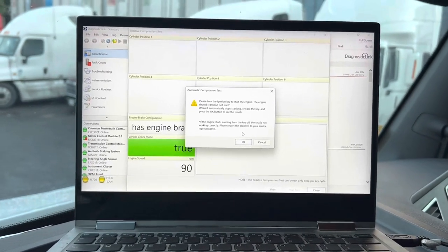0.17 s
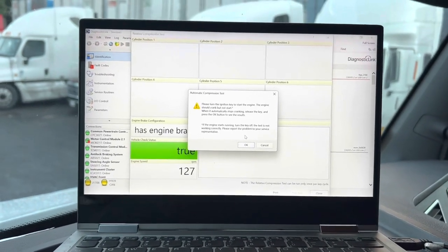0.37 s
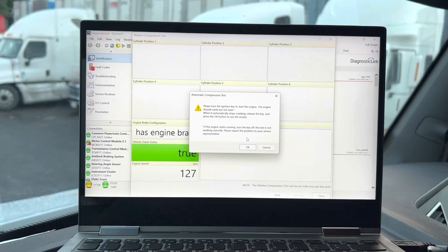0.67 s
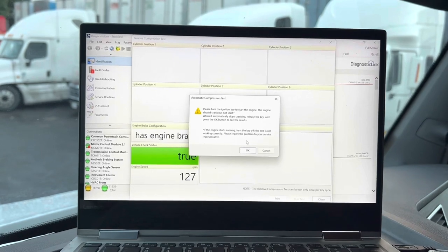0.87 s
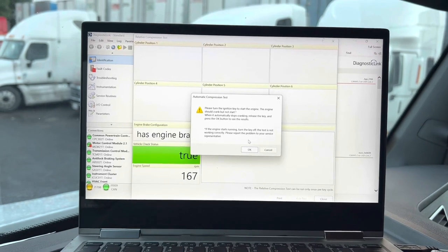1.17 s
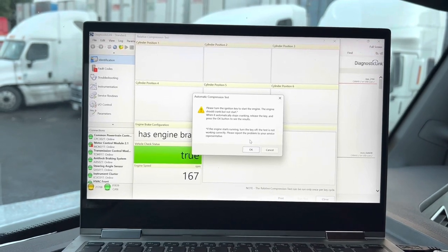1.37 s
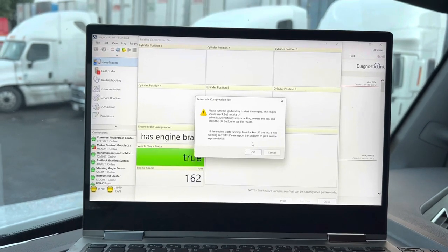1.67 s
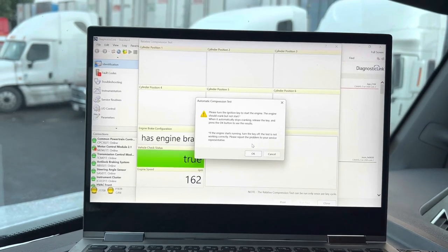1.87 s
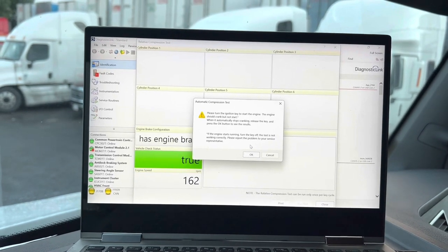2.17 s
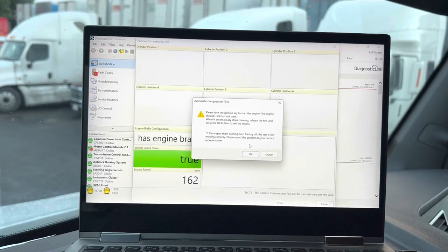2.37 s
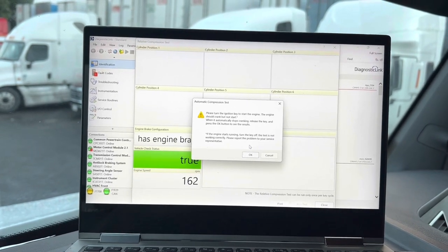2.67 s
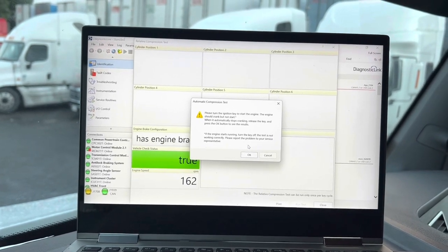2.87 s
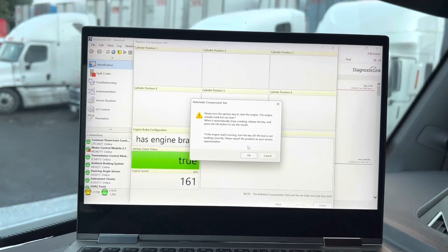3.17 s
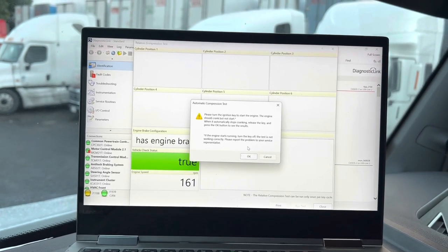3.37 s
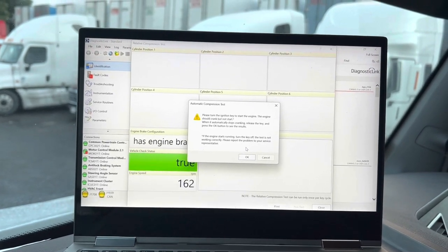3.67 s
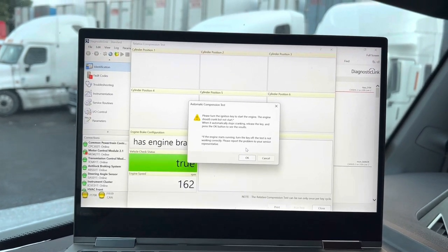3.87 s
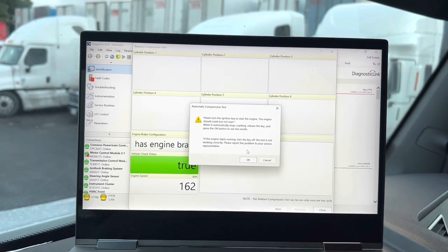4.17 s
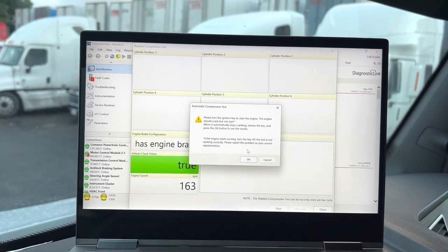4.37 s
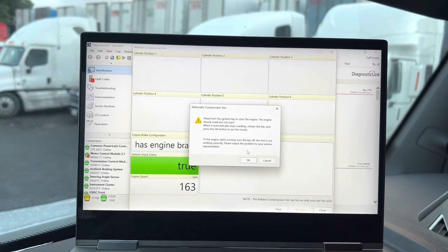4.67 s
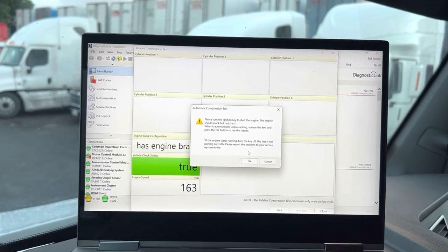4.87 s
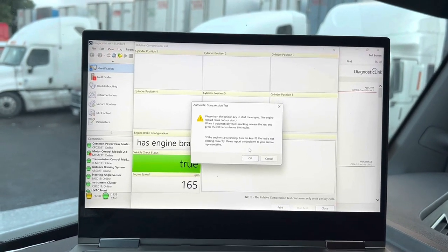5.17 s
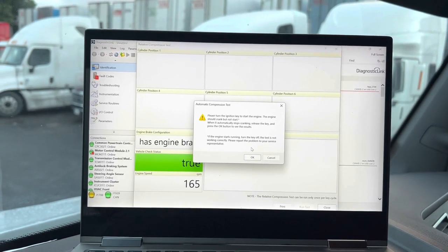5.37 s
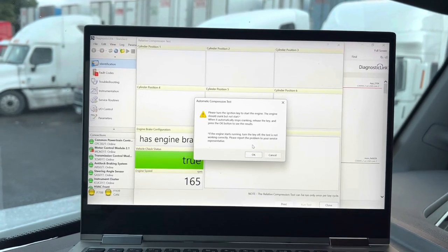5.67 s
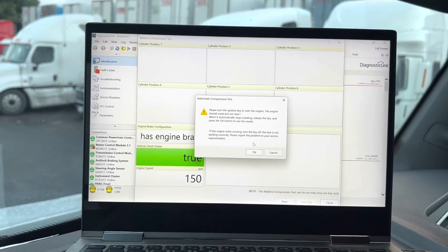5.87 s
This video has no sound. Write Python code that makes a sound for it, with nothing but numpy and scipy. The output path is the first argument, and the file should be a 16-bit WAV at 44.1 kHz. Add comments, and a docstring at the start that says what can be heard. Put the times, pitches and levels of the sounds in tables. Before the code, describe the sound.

Heard from inside a truck cab, a starter turns a large diesel engine in a fast, even rhythm of groaning, grinding and low thumps, but it never fires. The cab booms and loose trim ticks now and then. After about five seconds the starter gives a tiny squeal and lets go, the ignition key clicks back with a light jingle, and the engine coasts down.

```python
"""A groaning, grinding starter cranks a big six-cylinder diesel that never fires, heard inside the cab.
Each compression loads and slows the starter gear (falling groan, grind), then kicks the cab with a low
thump. Panels rumble, the cab air booms, loose trim ticks. The pinion slips with a short squeal, the
starter lets go, the ignition key snaps back with a jingle and the engine coasts to rest."""
import sys
import numpy as np
from scipy import signal
from scipy.fft import rfft, irfft, next_fast_len
from scipy.io import wavfile
from scipy.ndimage import map_coordinates

SR = 44100
rng = np.random.default_rng(int(sys.argv[2]) if len(sys.argv) > 2 else 0)


def generate_wav(signal):
    """Clip the signal to [-1, 1] and save it as 16-bit WAV at the path in sys.argv[1]."""
    frames = np.transpose(np.atleast_2d(signal))
    scaled = np.clip(frames, -1, 1) * 32767
    pcm = np.round(scaled).astype(np.int16)
    wavfile.write(sys.argv[1], SR, pcm)


N = 264952

# cranked compressions, from cylinder 6 on: (middle [s], thump [dB], groan [dB], whine [dB])
CRANKED = [(-0.026, -28, -41, -45), (0.101, -26.5, -33, -43.5), (0.225, -26.5, -29, -45.5),
           (0.348, -26.5, -31, -44), (0.468, -24, -37, -49), (0.585, -23.5, -33.5, -40.5),
           (0.709, -25, -26.5, -44.5), (0.833, -22.5, -32, -48), (0.959, -28.5, -31.5, -43),
           (1.081, -31, -32.5, -45), (1.203, -31, -34.5, -64), (1.317, -23.5, -30.5, -39.5),
           (1.442, -28, -29.0, -42), (1.57, -22, -31, -50), (1.697, -22.5, -30, -48.5),
           (1.818, -29.5, -29.5, -42.5), (1.94, -33, -34, -49), (2.06, -24, -30.5, -47),
           (2.184, -26.5, -27, -41.5), (2.313, -21, -28.5, -44), (2.438, -23, -31.5, -42.5),
           (2.563, -34, -27.5, -42), (2.685, -27, -29.5, -47), (2.802, -28.5, -30, -51),
           (2.925, -23, -32.5, -44.5), (3.051, -25.5, -29.5, -41.5), (3.179, -31, -33, -53),
           (3.301, -24, -36, -44), (3.422, -30, -32, -54), (3.54, -24, -31, -43.5),
           (3.661, -24, -32, -48.5), (3.791, -25, -31.5, -43.5), (3.913, -29, -29, -46.5),
           (4.032, -29.5, -34, -47.5), (4.155, -30, -29.5, -46), (4.267, -25, -28, -50),
           (4.389, -27, -31, -46), (4.514, -28, -38, -45.5), (4.637, -33, -34.5, -45.5),
           (4.757, -28, -27, -46), (4.875, -39.5, -33.0, -56), (4.989, -31.5, -33, -43.5),
           (5.109, -39, -29, -41), (5.234, -44, -32.5, -50)]
# cylinders in firing order: (load take-up before the middle [s], grind [dB])
CYLINDERS = [(.033, -51), (.039, -52), (.0386, -51.5), (.037, -52.5), (.038, -51.5), (.033, -51.5)]
# coasting compressions: (middle [s], take-up [s], thump [dB], groan [dB], whine [dB], grind [dB])
COASTING = [(5.358, 0.04, -49, -34.5, -66, -57.5), (5.473, 0.027, -27.5, -46, -67, -59.5),
            (5.741, .042, -30.5, -47.5, -69, -57.5), (5.931, 0.026, -33, -47, -70, -63.5)]
# one compression: (time from middle [s], tooth rate [Hz], groan [dB], whine [dB], grind [dB], rumble [dB])
LOAD_CYCLE = [(-.056, 387, -14, -12.5, -10.5, -3.5), (-.041, 386, -8.5, -12, -10.5, -3),
              (-.036, 387, -1, 1.5, -4, 0), (-.018, 365, -4.5, 4.5, -2.5, 3), (-.002, 356, 4.5, 1, -1.5, 1),
              (.013, 322, -2.5, 0.5, -2.5, 1.5), (.033, 328.2, -8, -7, -6, -0.5),
              (.056, 381, -10, -19, -10.5, -2)]
# gear whine: (multiple of tooth rate, level [dB])
WHINE_PARTIALS = [(2, -2.5), (3, -1.5), (5, -10), (6, -19.5)]
# starter resonances: (frequency [Hz], width [Hz], level [dB])
HOUSING = [(165, 59, -11.5), (352.3, 45, 0.5), (407, 64, -8), (634.6, 24.8, 2), (784, 67, -4),
           (954.6, 43.6, 3.5), (1084, 80, -6), (1414, 230, -3), (1850, 280, -18.5), (2434, 380, -4),
           (3610, 430, -19.5), (4440, 280, -11)]
STEEL_LOADING = [(1980, 35, 6), (2213, 38, 0.5), (2388, 29, 4), (2593, 32, -4.5), (3230, 36, -1),
                 (3670, 38, -1), (3770, 45, -5)]
STEEL_TOP = [(4020, 28, 0), (4313, 30, 0.97), (4370, 21, 1), (4500, 27, 0), (4720, 28, -1)]  # near the top of the stroke
# level curves: (time [s], level [dB])
BRUSH_LEVEL = [(0, -67.5), (.6, -79), (5.3, -78), (5.6, -72)]
BOOM_LEVEL = [(0.0, -27), (1.05, -33), (2.04, -32), (3.24, -29), (3.6, -32), (4.5, -29.5), (5.37, -30),
              (5.42, -35.5), (5.47, -40.5), (5.6, -31.5), (5.645, -43.5), (5.68, -35), (5.72, -47),
              (5.8, -41), (5.87, -44), (5.95, -40.5)]
# trim strikes: (time [s], level [dB], rebound re strike [dB])
TRIM_TICKS = [(0.473, -48, -3.5), (0.835, -43, -5), (0.9618, -50, -4.5), (1.393, -53.5, -7),
              (1.573, -43, 0.5), (1.82, -43.5, 1.5), (2.3133, -46, 1), (2.4388, -44, -5),
              (2.5617, -44.5, 1), (2.686, -46, 0.5), (3.055, -48.5, -5.5), (3.0924, -49, -6),
              (4.522, -46.5, -3), (4.6456, -53.5, -1), (4.7626, -52, 0), (5.125, -49.5, -4),
              (5.3753, -53.5, -1)]
# key switch snaps: (time [s], level [dB], jingle re snap [dB], snap t60 [s])
KEY_SNAPS = [(5.5208, -42.5, -14.5, 0.085), (5.6533, -41, -5.5, 0.03), (5.654, -27.5, -7, 0.049),
             (5.6615, -27, -22.5, 0.03), (5.6664, -33.5, -16, 0.036), (5.6984, -33.5, -13.5, 0.055),
             (5.7752, -38, -12, 0.051), (5.782, -44, -11, 0.04), (5.985, -52, -16, 0.043)]

# struck modes: (frequency [Hz], level [dB], t60 [s])
CLUNK_MODES = [(352, -2, 0.044), (466, -4, 0.065), (634, -10.5, 0.091), (1030, -12, 0.035)]  # gear play closing
BLOCK_MODES = [(172.5, -2.5, 0.086), (215.2, -1.5, 0.1)]
CAB_MODES = [(34.2, -9, 1), (44.5, 7, 0.27), (126, -10, 0.041)]  # cab on its mounts
TRIM_MODES = [(1510, 3, 0.044), (2250, 6, 0.019), (3590, -7.5, 0.037), (6260, -12, 0.02), (7200, -8, 0.023)]
KEYRING_MODES = [(870, -3, .07), (1070, -3, .06), (1400, -4, .06), (1910, 4, .05), (2600, -8, .05),
                 (3650, -7, .05), (5000, -11, .05), (6300, -16, .05), (7750, -18, .06)]

# noise spectra: (frequency [Hz], relative density [dB])
GRIND_SPECTRUM = [(240, -35.5), (400, -17.5), (569, -8), (643, -4), (873, -16.5), (972, -13.5), (1490, -14),
                  (2290, -21), (3410, -30.5), (8150, -42.5), (10300, -64.5), (15500, -72)]
HISS_SPECTRUM = [(2500, -29), (4500, 1), (6000, -2.5), (9300, -1), (10000, -29), (15500, -56.5)]
BOOM_SPECTRUM = [(20, -45.5), (45, 0.5), (62, -12), (76, -4), (92, -14.5), (140, -51), (240, -120)]
PANEL_SPECTRUM = [(53, -26), (90, -2), (102, -4), (129, -1.5), (216, -10), (257, -14), (355, -12),
                  (399, -14.5), (456, -18.5), (520, -29.5), (680, -34.5), (1140, -120)]
TRIM_SPECTRUM = [(700, -120), (1200, 4), (2200, 5.5), (4500, -3.5), (8000, -12.5), (12000, -8),
                 (15500, -21.5)]
SWITCH_SPECTRUM = [(290, -41), (500, -8), (700, -4), (919, -2), (1150, -3.5), (1860, -4), (4000, -26.5),
                   (5200, -49), (8800, -120)]
JINGLE_SPECTRUM = [(1880, -40), (3200, -13.5), (3700, -9.5), (7850, -17), (10900, -24), (15500, -20)]
AIR_SPECTRUM = [(59, -34.5), (100, 6), (386, -7.5), (727, -19), (4020, -40.5), (4460, -38), (5750, -37),
                (9340, -44), (10200, -47.5), (15500, -42.5)]

# microphone ports: (frequency [Hz], likeness [0-1], left minus right [dB], left lead [rad])
PORTS = [(40, 1, 0, 0), (95, .985, .5, 0), (160, .9, 1.2, .14), (240, .75, -1.5, .15),
         (340, .82, -5.6, -.35), (450, .63, .5, .6), (640, .55, -1.4, .3), (1300, .15, -1.5, .3),
         (1800, .3, -.4, -1.6), (2600, .5, 1.2, .5), (3300, .5, 3, 1), (6000, .4, 4.5, .4),
         (8500, .5, -.5, 0)]

CYCLE_TAKE_UP_S, RELEASE_S = .037, 5.3  # take-up of LOAD_CYCLE; starter lets go
SQUEAL_S, SQUEAL_WIDTH_S, SQUEAL_HZ, SQUEAL_RISE_HZ_PER_S, SQUEAL_DB = 5.232, .02, 846, 1700, -36
KNOCK_OVER_GRIND_DB, KNOCK_LAG_S, KICK_LEAD_S = 23, .00793, .014
HUM_HZ, HUM_DUCK_DB_PER_DB = 75.2, .58
RUMBLE_DB, RUNDOWN_DB_PER_S = -30.5, 23.5
REBOUND_S, AIR_DB = .013, -47
LOW_CUT_HZ, DULL_HZ, DULL_DB, TOP_HZ = 26.4, 9450, -9, 15700
TIME_S, HIT_SAMPLES = np.arange(N) / SR, SR // 4


def starter(strokes):
    """Gear teeth groan, whine and scrape through the housing; each compression loads and slows them."""
    tooth_hz, groan_swell_db, whine_swell_db, grind_swell_db, _ = load_cycle(strokes)
    groan_db, whine_db, grind_db = curves(strokes, TIME_S)[2:5]
    phase = 2 * np.pi * np.cumsum(tooth_hz * (1 + .0201 * wobble(9)[0])) / SR
    groan = amp(groan_db + groan_swell_db) * tooth_partial(.97 * phase)
    whine = sum(amp(db) * tooth_partial(k * phase) for k, db in WHINE_PARTIALS)
    teeth = groan + amp(whine_db + whine_swell_db) * whine
    loading_ring = amp(-4.5 + 1.9 * grind_swell_db) * steel_ring(STEEL_LOADING)
    top_ring = amp(-19) * steel_ring(STEEL_TOP)
    top_hiss = amp(-27.5) * noise(HISS_SPECTRUM)
    rings = amp(grind_db) * (loading_ring + amp(.76 * groan_swell_db) * (top_ring + top_hiss))
    brush_hiss = amp(curves(BRUSH_LEVEL, TIME_S)[0]) * noise(HISS_SPECTRUM)
    rubbing = (1 + .35 * np.cos(phase)) * amp(1.5 * wobble(70)[0])  # peaks once a tooth
    scrape = amp(grind_db + grind_swell_db) * rubbing * noise(GRIND_SPECTRUM)
    loose_parts = grit(340, spread_db=7, t60_s=.021) * noise(TRIM_SPECTRUM)
    clatter = amp(grind_db + 2.9 * grind_swell_db - 10) * loose_parts
    housing = resonate(amp(2.5) * teeth + amp(15.5) * scrape + amp(3.5) * clatter, HOUSING)
    return housing + amp(6) * scrape + clatter + rings + brush_hiss


def tooth_partial(phase):
    """One gear partial, smeared by uneven teeth."""
    return amp(1.5 * wobble(60)) * np.cos(phase + .7 * wobble(90))


def steel_ring(resonances):
    """Narrow steel resonances kept ringing by grit, rms 1."""
    impacts = grit(380, spread_db=5, t60_s=.0073) * rng.standard_normal((2, N))
    return unit(resonate(impacts, resonances))


def compressions():
    """All strokes, columns as COASTING; cranked ones take their cylinder's take-up and grind."""
    take_up_s, grind_db = np.resize(np.roll(CYLINDERS, 1, axis=0), (len(CRANKED), 2)).T
    grind_db = grind_db + .4 * rng.standard_normal(len(CRANKED))
    middle_s, *levels_db = np.transpose(CRANKED)
    return np.vstack([np.transpose([middle_s, take_up_s, *levels_db, grind_db]), COASTING])


def load_cycle(strokes):
    """LOAD_CYCLE at every sample; the loading part stretches to each stroke's take-up."""
    middle_s, take_up_s = np.transpose(strokes)[:2]
    nearest = np.searchsorted((middle_s[1:] + middle_s[:-1]) / 2, TIME_S)
    offset_s = TIME_S - middle_s[nearest]
    stretched_s = offset_s * CYCLE_TAKE_UP_S / take_up_s[nearest]
    return curves(LOAD_CYCLE, np.where(offset_s < 0, stretched_s, offset_s))


def pinion_squeal():
    """A short rough tone that rises as the pinion slips."""
    t = TIME_S - SQUEAL_S
    phase = 2 * np.pi * (SQUEAL_HZ * t + SQUEAL_RISE_HZ_PER_S * t ** 2 / 2)
    return amp(SQUEAL_DB) * np.exp(-(t / SQUEAL_WIDTH_S) ** 2) * np.cos(phase + wobble(90))


def engine_thumps(strokes):
    """Gear play closes with a clunk; the piston passing the top knocks the block and rocks the cab."""
    out = np.zeros((2, N + 2 * SR))  # 1 s margin at each end
    for middle_s, take_up_s, thump_db, _, _, grind_db in strokes:
        knock_db = grind_db + KNOCK_OVER_GRIND_DB + rng.standard_normal()
        clunk = amp(grind_db + 21) * ringing(CLUNK_MODES, attack_s=.0033, scatter_db=1.5)
        knock = amp(knock_db) * ringing(BLOCK_MODES, attack_s=.0072, scatter_db=4.5)
        kick = amp(thump_db + 7.5) * ringing(CAB_MODES, attack_s=.023, scatter_db=.5)
        add_hit(out, 1 + middle_s - take_up_s, clunk)
        add_hit(out, 1 + middle_s + KNOCK_LAG_S, knock)
        add_hit(out[0], 1 + middle_s - KICK_LEAD_S, kick)  # mid only
    return out[:, SR:SR + N]


def cab_shake(strokes):
    """Cab air hums and booms; panels rumble with the load while the hum dips."""
    coast_s = np.maximum(TIME_S - RELEASE_S, 0)
    load_db = load_cycle(strokes)[-1] * (1 + 2.2 * coast_s)  # slower strokes leave deeper gaps
    hum_db = 3.3 * wobble(14)[0] - HUM_DUCK_DB_PER_DB * load_db
    hum_hz = HUM_HZ * (1 + .0604 * wobble(10)[0])
    hum = amp(hum_db) * np.sin(2 * np.pi * np.cumsum(hum_hz) / SR) * [[1], [0]]  # mid only
    boom = amp(-.5 + 1.4 * wobble(5.7)[0]) * noise(BOOM_SPECTRUM)
    rumble_db = RUMBLE_DB - RUNDOWN_DB_PER_S * coast_s + load_db + 1.5 * wobble(25)[0]
    return amp(curves(BOOM_LEVEL, TIME_S)[0]) * (boom + hum) + amp(rumble_db) * noise(PANEL_SPECTRUM)


def trim_ticks():
    """Loose trim strikes at some of the kicks and rebounds once."""
    out = np.zeros((2, N + SR))
    for time_s, db, rebound_db in TRIM_TICKS:
        contact = burst(TRIM_SPECTRUM, t60_s=.035, attack_s=.00059)
        ring = amp(-7.5) * ringing(TRIM_MODES, attack_s=.00032, scatter_db=2)
        tick = amp(db) * (contact + ring)
        add_hit(out, time_s, tick)
        add_hit(out, time_s + REBOUND_S, amp(rebound_db) * tick[::-1])  # mid and side swapped
    return out[:, :N]


def ignition_key():
    """The plastic switch snaps, the keys jingle on their ring, the cab answers briefly."""
    out = np.zeros((2, N + SR))
    for time_s, db, jingle_db, t60_s in KEY_SNAPS:
        snap = burst(SWITCH_SPECTRUM, t60_s, attack_s=.00019)
        jingle = amp(jingle_db - .5) * burst(JINGLE_SPECTRUM, 3.04 * t60_s, attack_s=.00044)
        keys = np.array([ringing(KEYRING_MODES, attack_s=.001, scatter_db=2) for _ in range(2)])
        cab = amp(-3) * burst(SWITCH_SPECTRUM, t60_s=.12, attack_s=.0082)
        add_hit(out, time_s, amp(db - 3) * (snap + jingle + amp(jingle_db / 2 + 1) * keys + cab))
    return out[:, :N]


def cab_air():
    """Steady noise floor of the still cab."""
    return amp(AIR_DB) * noise(AIR_SPECTRUM)


def mic_ports(mid_side):
    """Mid/side to left/right: two close ports whose likeness, balance and lead depend on pitch."""
    port = lambda hz, column: along(np.array(PORTS)[:, [0, column]], hz)
    angle = lambda hz: np.arccos(np.clip(port(hz, 1), 0, 1)) / 2
    mid, side = filtered(mid_side, lambda hz: np.array([np.cos(angle(hz)), np.sin(angle(hz))]))
    left_gain = lambda hz: amp(port(hz, 2) / 2) * np.exp(.5j * port(hz, 3))
    left_right = np.array([mid + side, mid - side])
    return filtered(left_right, lambda hz: np.array([left_gain(hz), 1 / left_gain(hz)]))


def ringing(modes, attack_s, scatter_db):
    """Struck modes; level and tuning vary per blow."""
    hz, db, t60_s = np.transpose(modes)[..., None]
    t = np.arange(min(HIT_SAMPLES, round(SR * t60_s.max()))) / SR
    level_draw, pitch_draw = rng.standard_normal((2, len(hz), 1))
    decay = amp(db + scatter_db * level_draw - 60 * t / t60_s)
    partials = decay * np.sin(2 * np.pi * hz * (1 + .013 * pitch_draw) * t)
    fades = (1 - np.exp(-(t / attack_s) ** 2)) * np.minimum(t[::-1] / .016, 1)
    return np.pad(partials.sum(axis=0) * fades, (0, HIT_SAMPLES - len(t)))


def burst(spectrum, t60_s, attack_s):
    """A decaying noise hit."""
    t = np.arange(HIT_SAMPLES) / SR
    return noise(spectrum, HIT_SAMPLES) * amp(-60 * t / t60_s) * (1 - np.exp(-t / attack_s))


def grit(rate_hz, spread_db, t60_s):
    """Envelope of tiny random impacts, rms 1."""
    hits = (rng.random(N) < rate_hz / SR) * amp(spread_db * rng.uniform(-1.2, 1, N))
    return unit(signal.lfilter([1], [1, -amp(-60 / (SR * t60_s))], hits))


def resonate(x, resonances):
    """x through parallel band-passes of alternating sign."""
    return filtered(x, lambda hz: sum(
        (-1) ** k * amp(db) * 1j * hz * width_hz / (centre_hz ** 2 - hz ** 2 + 1j * hz * width_hz)
        for k, (centre_hz, width_hz, db) in enumerate(resonances)))


def noise(spectrum, size=N):
    """Two unrelated coloured noises, rms 1."""
    return unit(filtered(rng.standard_normal((2, size)), lambda hz: amp(along(spectrum, hz))))


def wobble(rate_hz):
    """Two smooth random curves with knots at rate_hz."""
    coarse = np.arange(0, N + 16, 16)
    knots = rng.standard_normal((2, int(N * rate_hz / SR) + 4))
    splines = [map_coordinates(row, [coarse * rate_hz / SR]) for row in knots]
    return np.array([np.interp(np.arange(N), coarse, spline) for spline in splines])


def filtered(x, response):
    """x through a complex frequency response."""
    size = next_fast_len(x.shape[-1] + 8192)
    return irfft(rfft(x, size) * response(np.fft.rfftfreq(size, 1 / SR)), size)[..., :x.shape[-1]]


def add_hit(out, time_s, hit):
    """Mix a hit into out."""
    out[..., round(time_s * SR):][..., :HIT_SAMPLES] += hit


def curves(rows, at_s):
    """Each column after the time, interpolated at at_s."""
    time_s, *columns = np.transpose(rows)
    return [np.interp(at_s, time_s, column) for column in columns]


def along(points, hz):
    """(Hz, value) points interpolated on a log axis."""
    point_hz, values = np.transpose(points)
    return np.interp(np.log(hz + 1), np.log(point_hz + 1), values)


def amp(db):
    """dB to gain."""
    return 10 ** (np.asarray(db) / 20)


def unit(x):
    """Scale to rms 1."""
    return x / np.sqrt(np.mean(x ** 2) + 1e-20)


def scene():
    """All sources, summed as mid/side, reach both ports."""
    strokes = compressions()
    engine = starter(strokes) + pinion_squeal() + engine_thumps(strokes)
    return mic_ports(engine + cab_shake(strokes) + trim_ticks() + ignition_key() + cab_air())


def record(dry):
    """Soft saturation, low cut, dulled top treble, band limit."""
    high_pass = lambda s: s ** 2 / (1 + np.sqrt(2) * s + s ** 2)
    treble = lambda hz: np.where(hz < DULL_HZ, 1, amp(DULL_DB)) * (hz < TOP_HZ)
    rounded = dry / (1 + np.abs(dry / .3) ** 4) ** .25
    return filtered(rounded, lambda hz: high_pass(1j * hz / LOW_CUT_HZ) ** 2 * treble(hz))


dry = scene()
out = record(dry)
generate_wav(out)
```